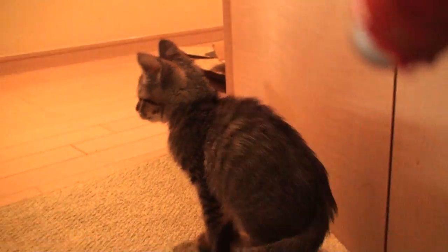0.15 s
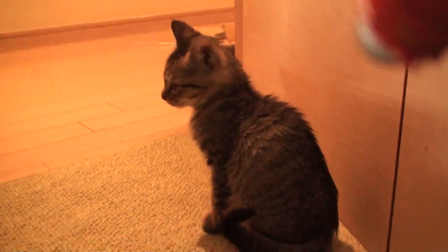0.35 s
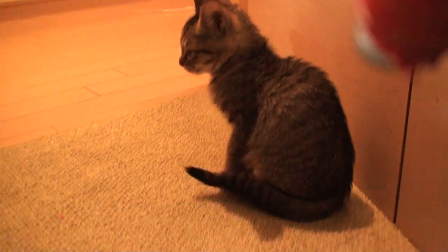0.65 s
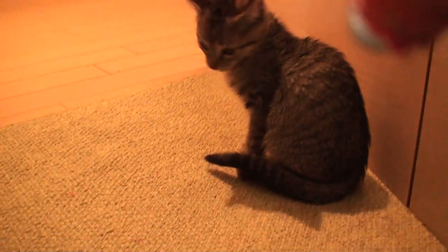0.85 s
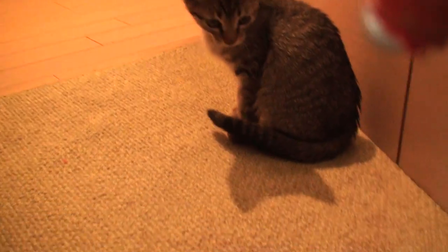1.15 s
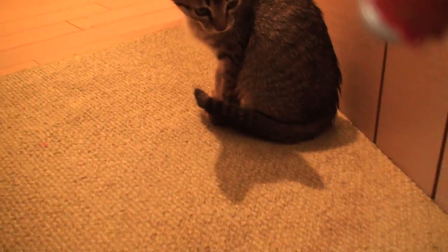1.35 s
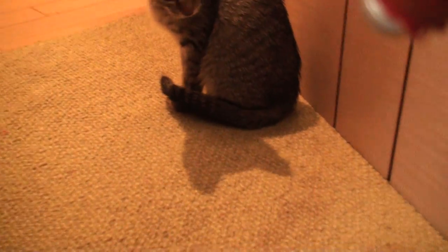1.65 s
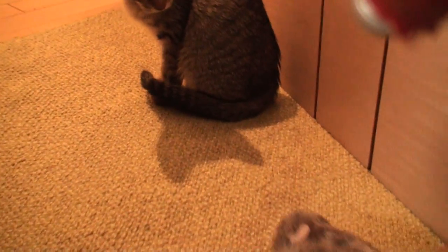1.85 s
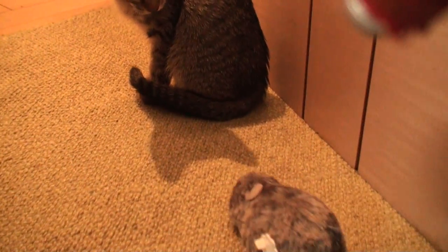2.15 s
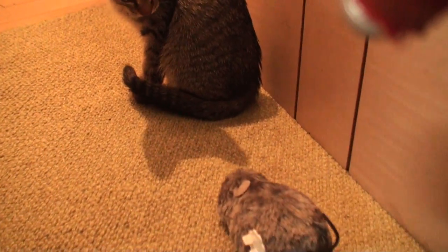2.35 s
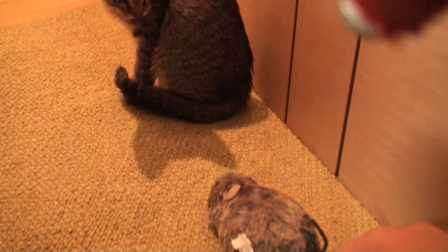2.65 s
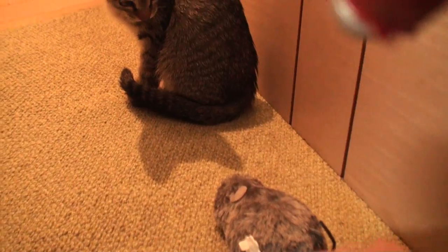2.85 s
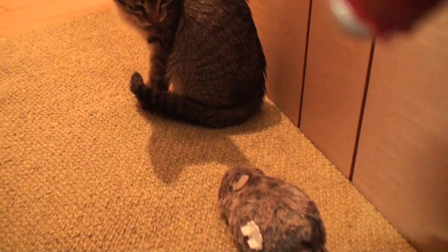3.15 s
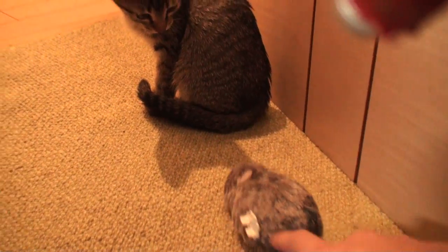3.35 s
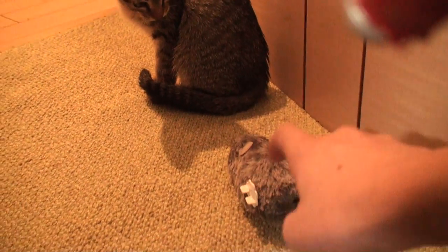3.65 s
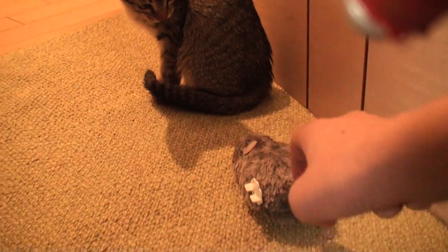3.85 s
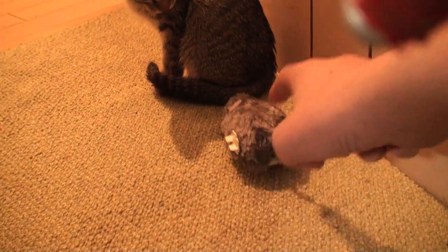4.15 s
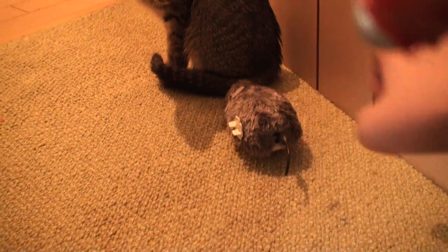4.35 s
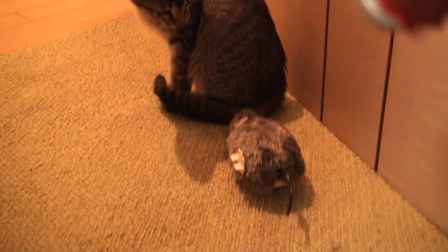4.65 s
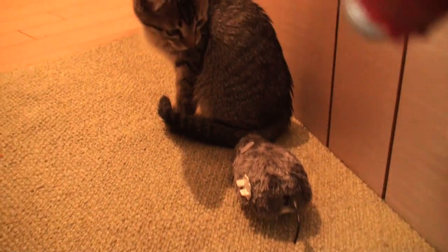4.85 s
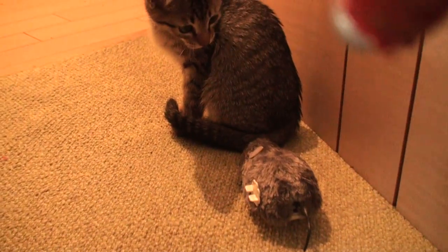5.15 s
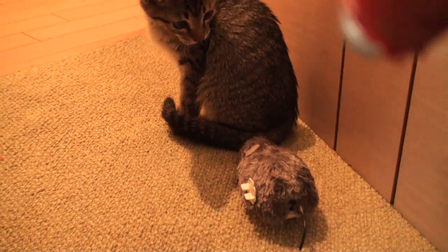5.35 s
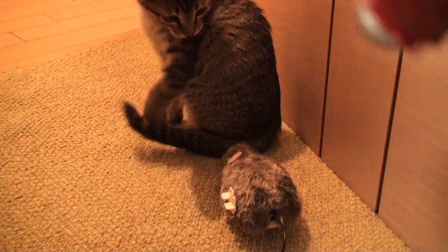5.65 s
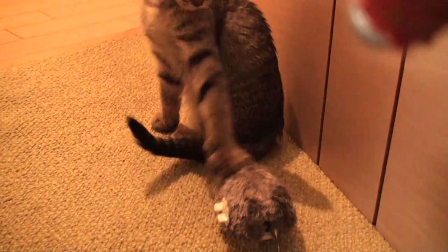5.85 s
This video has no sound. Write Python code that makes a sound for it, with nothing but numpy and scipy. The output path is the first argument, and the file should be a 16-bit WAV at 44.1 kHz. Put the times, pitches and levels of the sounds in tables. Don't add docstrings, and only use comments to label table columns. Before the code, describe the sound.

Close, nearly mono sound in a home interior. A cracking bump on the recorder opens, bouncing within a few hundredths of a second. Quick plastic gear clicks follow around one and two seconds, then a few at three, and a looser rattle just after four as the toy mouse is moved over woven carpet. Faint fur and cloth brushing and dull floor thuds accompany them. Low boomy rumble and hiss continue throughout, with one soft bat near the end.

```python
import sys
import numpy as np
from scipy import signal
from scipy.io import wavfile
from scipy.ndimage import uniform_filter1d

SR = 44100
rng = np.random.default_rng(int(sys.argv[2]) if len(sys.argv) > 2 else 0)


def ratio(d):
    e = np.asarray(d, float) / 20
    return 10 ** e


def dump_mix(stems):
    frames = np.atleast_2d(stems).T
    limited = np.clip(frames, -1, 1)
    pcm = np.round(limited * 32767).astype(np.int16)
    wavfile.write(sys.argv[1], SR, pcm)


N = 264159


def read(points, hz):
    points_hz, value = np.transpose(points)
    return np.interp(np.log(hz + 1), np.log(points_hz + 1), value)


def evened(x):
    return x / np.sqrt(np.mean(x ** 2) + 1e-20)


def add(mix, start_s, sound):
    part = mix[round(start_s * SR):][:len(sound)]
    part += sound[:len(part)]


def resonate(x, hz, width_hz):
    pole = np.exp((2j * hz - width_hz) * np.pi / SR)
    once = signal.lfilter([1], [1, -pole], x)
    return signal.lfilter([1], [1, -pole], once).real


def decay(t, t60_s, rise_s):
    return ratio(-60 * t / t60_s) * (1 - np.exp(-t / rise_s))


def ring(level_db, hz, t60_s, rise_s=0.00015, turns=0.):
    t = np.arange(int(t60_s * SR) + 50) / SR
    return ratio(level_db) * decay(t, t60_s, rise_s) * np.sin(2 * np.pi * (hz * t + turns))


def room_floor():
    # hz, level_db
    background = [(12, -5), (28, -5), (95, -10), (169, -19), (551, -27), (900, -28), (3230, -34),
                  (15200, -37)]
    boom_hz, boom_width_hz, boom_db = 50.23, 5.4, 11.5
    frames = N // 2048 + 5
    hz = np.fft.rfftfreq(8192, 1 / SR)
    real, imaginary = rng.standard_normal((frames, 4097, 2)).T
    standing_wave_db = boom_db * np.exp(-((hz - boom_hz) / boom_width_hz) ** 2)
    shape_db = read(background, hz) + standing_wave_db
    spectrum = (real + 1j * imaginary) * ratio(shape_db)[:, None]
    noise = signal.istft(spectrum, nperseg=8192, noverlap=6144)[1][:N]
    return ratio(-36) * evened(noise)


def brushes():
    # start_s, length_s, level_db, centre_hz, width_hz
    strokes = [(0.222, 0.4, -40.5, 6000, 7500), (0.065, 0.021, -38, 686, 900), (1.05, .17, -56, 5000, 5000),
               (1.247, 0.093, -41, 3500, 4000), (1.383, 0.089, -45, 3000, 3500),
               (1.797, 0.13, -41, 5000, 6100), (2.0, 0.092, -56, 3500, 3500),
               (2.963, 0.15, -44, 4030, 4000), (3.36, 0.13, -39.5, 3000, 4020),
               (0.1666, 0.011, -23.5, 1950, 4130), (3.903, 0.044, -30.5, 250, 900),
               (3.906, 0.057, -45, 3500, 6000), (3.978, 0.0076, -40, 2000, 2500),
               (1.85, 0.085, -35.5, 640, 700), (4.014, 0.069, -36, 700, 900),
               (4.08, 0.084, -42.5, 1000, 1200), (4.02, 0.2, -42.5, 2500, 4000),
               (4.616, .014, -39, 6500, 7000), (4.63, 0.026, -44, 3500, 5000),
               (4.678, .04, -48, 2000, 4000), (4.898, .07, -48, 4000, 2500),
               (4.989, 0.072, -48.5, 3960, 2500), (5.059, 0.066, -44.5, 4500, 5000),
               (5.897, 0.1, -48, 3000, 5140)]
    out = np.zeros(N)
    grain_db = 4.5 * uniform_filter1d(rng.exponential(1, N), 8)
    grains = rng.standard_normal(N) * ratio(grain_db)
    for start_s, length_s, level_db, centre_hz, width_hz in strokes:
        stroke = grains[round(start_s * SR):][:int(length_s * SR)]
        friction = evened(resonate(stroke, centre_hz, width_hz))
        add(out, start_s, ratio(level_db) * friction * np.hanning(len(stroke)))
    return out


def camera_knock():
    # start_s, level_db, pitch_hz, t60_s, direction (-1 in, 1 out)
    contacts = [
        (0.17, -25, 1500, 0.011, 1),
        (.178, -3, 2140, 0.0069, -1),
        (0.1787, 8, 3840, 0.0013, -1),
        (.179, 5, 860, 0.0022, -1),
        (0.1814, 7.5, 890, 0.0016, 1),
        (0.1844, 4, 1310, 0.0026, 1),
        (0.1906, 0, 880, 0.0058, 1),
        (0.2008, 1.5, 1230, 0.0029, 1),
        (0.2242, -26, 800, 0.013, 1),
    ]
    # level_db, pitch_hz, t60_s
    spring = (-17.5, 5925, 0.14)
    out = np.zeros(N)
    for start_s, level_db, hz, t60_s, direction in contacts:
        rise_s = 0.15 / hz
        add(out, start_s, direction * ring(level_db, hz, t60_s, rise_s, turns=0.033))
    add(out, 0.1792, ring(*spring))
    return out


def thuds():
    # start_s, level_db, pitch_hz, t60_s, rise_s
    blows = [(0.1711, -11.5, 120.5, 0.29, 0.0025), (0.178, 0, 212, 0.033, 0.00085),
             (.2, -8.5, 303, 0.026, 0.0014), (0.209, -18, 68, 0.11, 0.0017),
             (1.257, -22.5, 60, 0.26, 0.021), (1.385, -17, 80, 0.13, 0.0079),
             (1.857, -20.5, 69, 0.21, 0.011), (3.91, -20.5, 193, 0.08, 0.0015),
             (3.907, -23.5, 507, 0.09, 0.00065), (.178, -12.5, 376, 0.058, 0.00092),
             (.181, -14, 553, .03, 0.00067), (4.06, -26.5, 585, 0.038, 0.0016),
             (4.6208, -18.5, 98.7, 0.23, 0.0028), (4.617, -22, 62, 0.4, 0.0083),
             (5.914, -13, 80, 0.1, 0.0082)]
    out = np.zeros(N)
    for start_s, *mode in blows:
        add(out, start_s, ring(*mode))
    return out


def click(shell_db, shell_hz, gear_db, gear_hz, hollow_db, noise, turns):
    t = np.arange(400) / SR

    def dying(t60_s):
        return decay(t, t60_s, 0.00039)

    def tone(hz, start_turns):
        return np.sin(2 * np.pi * (hz * t + start_turns))

    shell = 1.31 * tone(shell_hz, turns[0]) * dying(0.0072)
    shell += 0.23 * evened(resonate(noise[0], 3150, 2300)) * dying(0.022)
    pin = 0.17 * tone(9800, turns[0]) * dying(0.0093)
    crack = 0.62 * evened(resonate(noise[1], 6830, 6100)) * (0.67 * dying(0.011) + 1.24 * dying(0.0029))
    gear = 0.59 * tone(gear_hz, turns[1]) * dying(0.012) + pin + crack
    hollow = 0.4 * evened(resonate(noise[2], 670, 1220)) * dying(0.022)
    return 1.3 * (ratio(shell_db) * shell + ratio(gear_db) * gear + ratio(hollow_db) * hollow)


def clockwork_mouse():
    # start_s, shell_db, gear_db, gear_hz
    winding = [(.9169, -36, -29.5, 5640), (.9712, -26, -33, 6760), (1.0056, -33, -31, 5470),
               (1.0284, -29, -27, 5450), (1.0511, -20, -11, 7140), (1.0532, -22, -7, 5650),
               (1.0592, -6.5, -5, 4800), (1.067, -28, -21, 6440), (1.0741, -23, -25, 7060),
               (1.0827, -22, -30, 5080), (1.1032, -30, -25, 5380), (1.1259, -20, -34, 6980),
               (1.132, -25, -8.5, 5030), (1.134, -6.5, -6, 7250), (1.1498, -34, -24, 6960)]
    # start_s, shell_db, gear_db, gear_hz
    gripping = [(1.23, -42, -30, 6300), (1.2558, -39, -31, 5560), (1.2748, -27, -21, 6000),
                (1.2792, -19.5, -18.5, 7900), (1.2813, -19, -10.5, 5900), (1.2943, -33, -40, 5960),
                (1.3234, -28, -25.5, 7500), (1.3913, -23, -39, 6870), (1.4068, -17, -14.5, 5200),
                (1.4086, -16, -12, 5560), (1.799, -34, -43, 5100), (1.8025, -42, -27.5, 5100),
                (1.8706, -35, -11.5, 9800), (1.874, -13, -8, 5720), (1.8817, -15, -17, 7190),
                (1.89, -23, -7.5, 6220), (1.898, -22, -13, 7190), (1.9058, -36, -23, 5990),
                (1.9161, -24, -15, 6860), (1.9179, -11.5, -10.5, 6450), (1.9239, -19, -25, 5450),
                (1.951, -25, -25, 5530), (2.006, -26.5, -27, 6030), (2.017, -33, -24, 6240),
                (2.0237, -14, -14, 4880), (2.0377, -33, -28, 5700), (2.0545, -36, -35, 5210),
                (2.0733, -23, -28.5, 4970)]
    # start_s, shell_db, gear_db, gear_hz
    nudging = [(2.9744, -33, -31, 4900), (3.0175, -16.5, -15, 4800), (3.0445, -27, -38, 4800),
               (3.3671, -31, -37, 4840), (3.3939, -38, -26, 6030), (3.4026, -15, -26, 5210),
               (3.4099, -22, -25, 5500), (3.413, -36, -29, 5240), (3.4283, -20.5, -23, 6870),
               (3.9098, -33, -27, 5040), (4.0255, -26, -28, 5200), (4.0278, -17.5, -25, 7000),
               (4.037, -28, -16, 6400), (4.0406, -15.5, -17, 5370), (4.0604, -21, -24.5, 4800),
               (4.0798, -30, -32, 8250), (4.1038, -32, -31, 5210), (4.116, -21, -21.5, 8800),
               (4.1243, -20, -26, 6370), (4.1424, -21.5, -31, 6760), (4.1741, -9, -19, 5870),
               (4.1756, -11.5, -10, 10000), (4.187, -27, -25, 5210), (4.195, -24, -21, 7580),
               (4.2224, -20, -20.5, 5200), (5.909, -21.5, -27.5, 6570), (5.9505, -37, -31, 5540),
               (5.9525, -32, -33, 5500)]
    # shell_hz, spread_share, hollow_db (knock of a full-scale click)
    holds = [
        (3760, 0.066, -22.5),
        (2950, 0.071, -18.5),
        (3000, 0.087, -19.5),
    ]
    rattle_db, rattle_fade_db, rattle_s = -16, -7.5, 0.06
    rattle_low_hz, rattle_high_hz = 4800, 7200
    hollow_slope = 0.41
    out = np.zeros(N)
    for rows, (shell_hz, spread, full_hollow_db) in zip([winding, gripping, nudging], holds):
        noise = rng.standard_normal((len(rows), 4, 3, 400))
        chance = rng.random((len(rows), 4, 6))
        for (start_s, shell_db, gear_db, gear_hz), hiss, draws in zip(rows, noise, chance):
            click_hollow_db = full_hollow_db + hollow_slope * max(shell_db, gear_db)
            for k, (late, detune, pitch, soft, *turns) in enumerate(draws):
                delay_s, drop_db, hz = 0, 0, gear_hz
                if k > 0:
                    delay_s = rattle_s * late
                    drop_db = rattle_db + rattle_fade_db * (late + soft)
                    hz = rattle_low_hz + pitch * (rattle_high_hz - rattle_low_hz)
                detuned_hz = shell_hz * (1 + spread * (2 * detune - 1))
                tick = click(shell_db + drop_db, detuned_hz, gear_db + drop_db, hz,
                             click_hollow_db + drop_db, hiss[k], turns)
                add(out, start_s - 0.0002 + delay_s, tick)
    return out


def room(x):
    # hz, t60_s
    absorption = [(500, 0.45), (3000, 0.18), (7000, 0.15), (13000, 0.051)]
    taps = np.zeros(SR // 2)
    at = np.arange(300, SR // 2 - 20, 20)
    taps[at + rng.integers(0, 20, len(at))] = rng.choice([-1., 1.], len(at))
    hz, t, spectrum = signal.stft(taps, SR, nperseg=256)
    fading = ratio(-60 * t / read(absorption, hz)[:, None])
    tail = signal.istft(spectrum * fading, SR, nperseg=256)[1]
    return signal.fftconvolve(x, tail / np.linalg.norm(tail))[:N]


def channel_hiss(hiss):
    # hz, level_db (under the common background)
    apart = [(40, -40.5), (300, -32.5), (700, -30), (1500, -34), (3000, -34.5), (6000, -34.5),
             (10000, -22.5), (14000, -23)]
    patch_db = 5
    hz, t, spectrum = signal.stft(hiss, SR, nperseg=1024)
    patches = uniform_filter1d(rng.standard_normal(spectrum.shape), size=30, axis=0)
    patches = evened(uniform_filter1d(patches, size=3, axis=1))
    level_db = read(apart, hz)[:, None] + patch_db * patches
    phases = np.exp(2j * np.pi * rng.random(spectrum.shape))
    return signal.istft(spectrum * ratio(level_db) * phases, SR, nperseg=1024)[1][:N]


def scene():
    hiss = room_floor()
    strokes = brushes()
    body = camera_knock() + thuds()
    clicks = clockwork_mouse()
    reverberant = room(ratio(-13.0) * clicks + ratio(-30.5) * body)
    mono = clicks + body + strokes + hiss + reverberant
    side = channel_hiss(hiss)
    return np.array([mono + side, mono - side])


def top_cut(x):
    return signal.sosfilt(signal.butter(12, 16670, fs=SR, output="sos"), x)


def record(dry):
    edge_hz, top_hz, shelf_db = 15850, 16650, -40
    low = signal.firwin(511, edge_hz, window=("kaiser", 9), fs=SR)
    top = signal.firwin(511, top_hz, window=("kaiser", 9), fs=SR)
    input_filter = low + ratio(shelf_db) * (top - low)
    band = signal.oaconvolve(np.clip(dry, -1, 1), input_filter[None], "same")
    return top_cut(band)


dry = scene()
out = record(dry)
dump_mix(out)
```